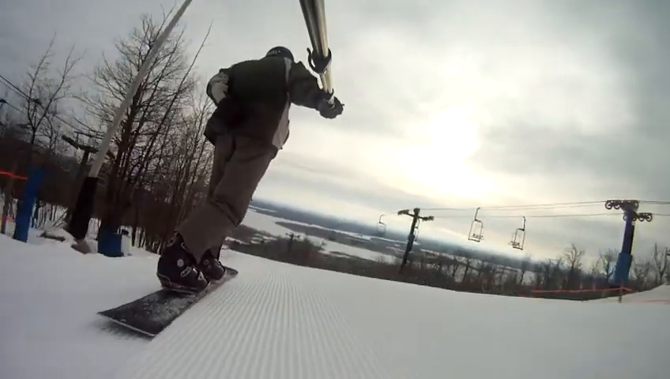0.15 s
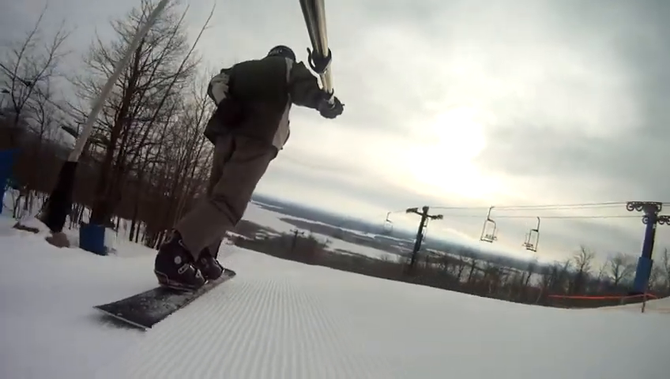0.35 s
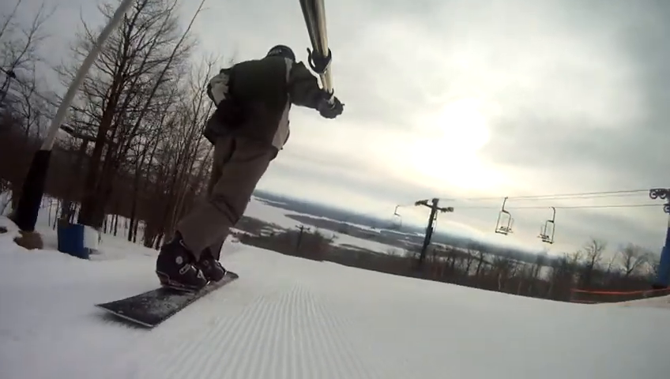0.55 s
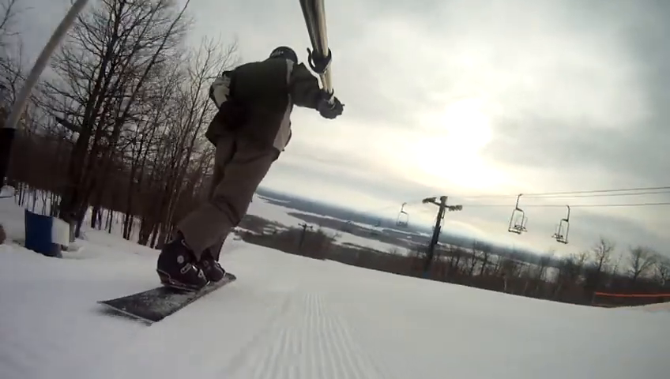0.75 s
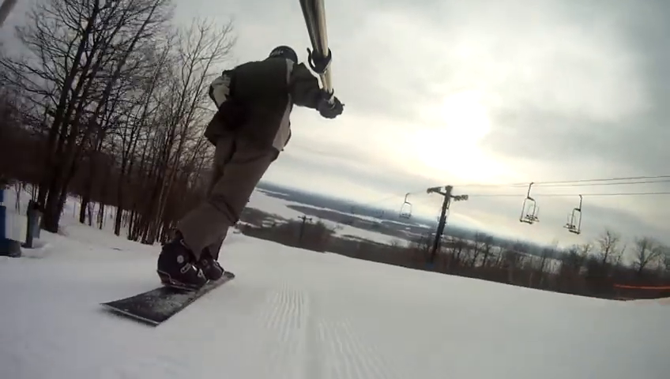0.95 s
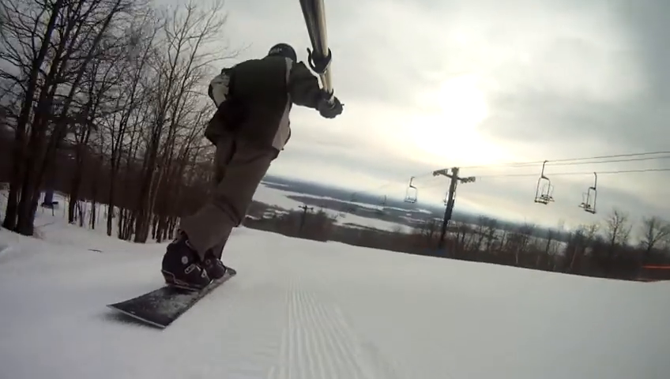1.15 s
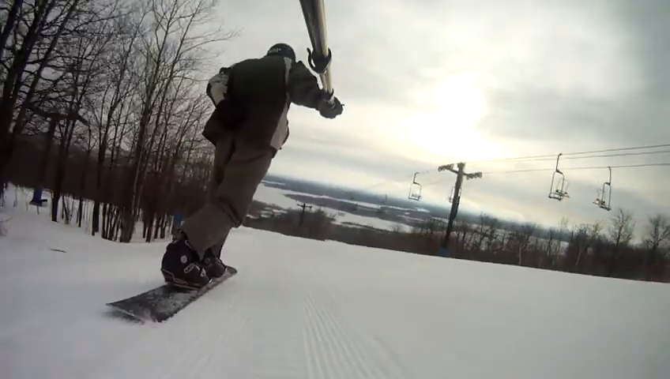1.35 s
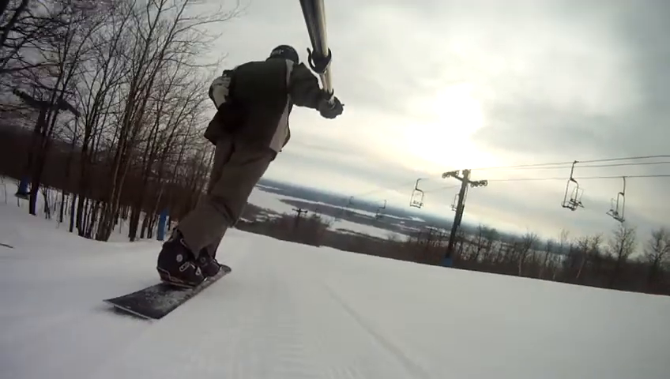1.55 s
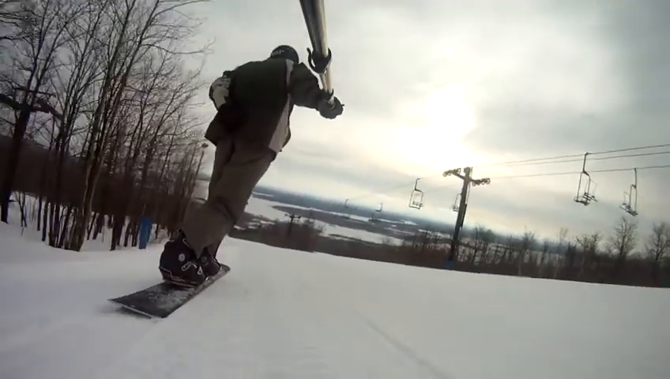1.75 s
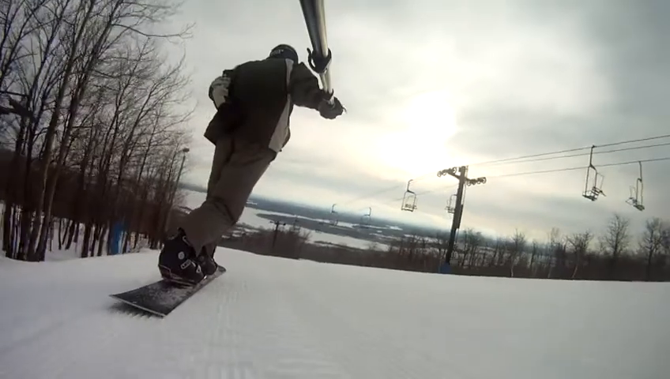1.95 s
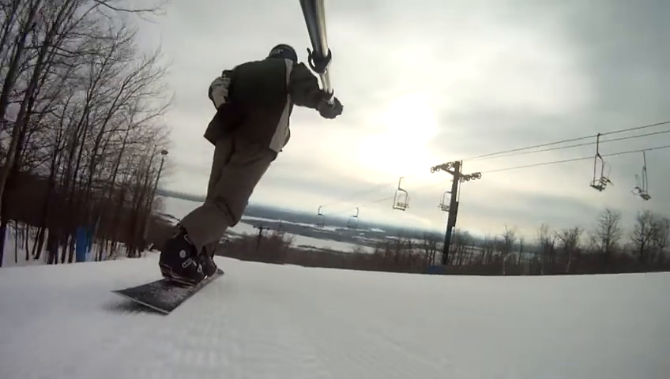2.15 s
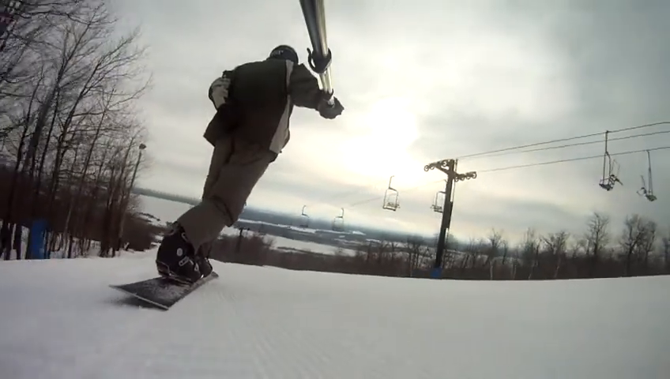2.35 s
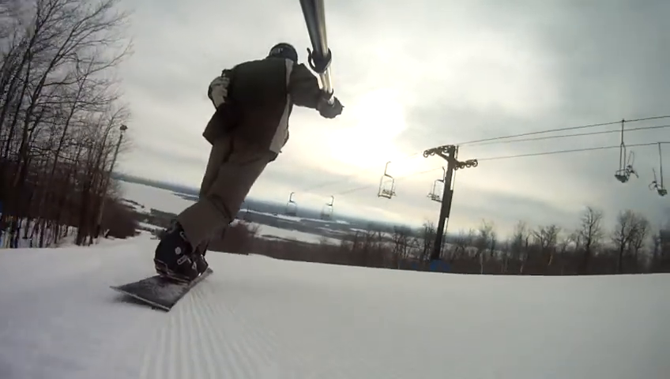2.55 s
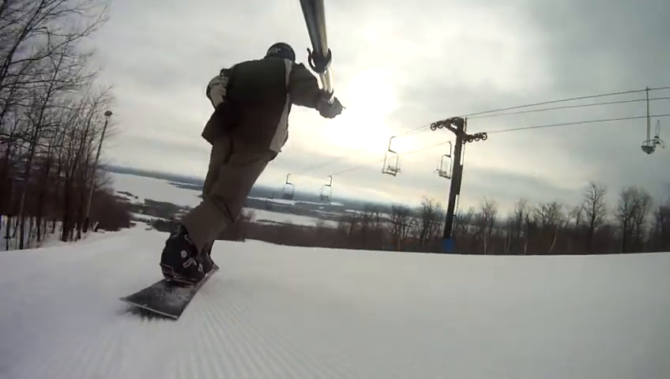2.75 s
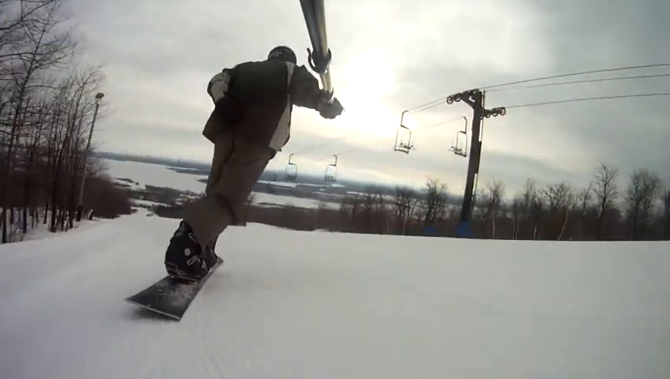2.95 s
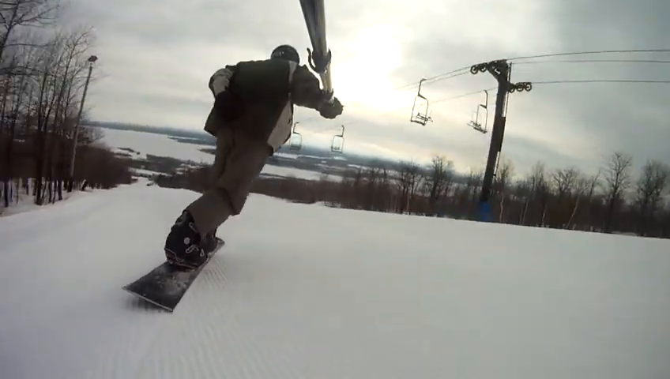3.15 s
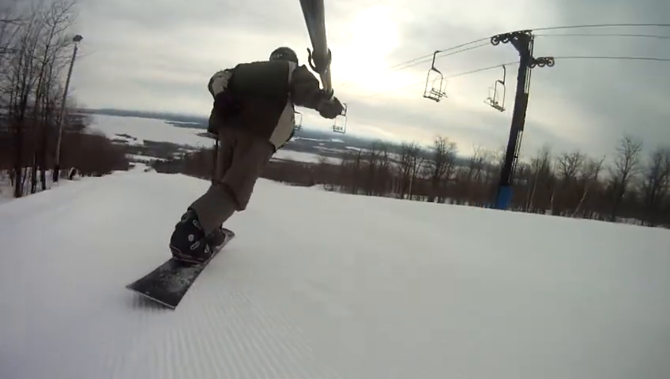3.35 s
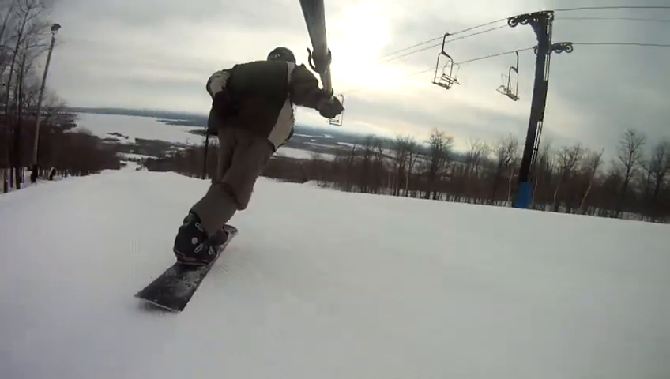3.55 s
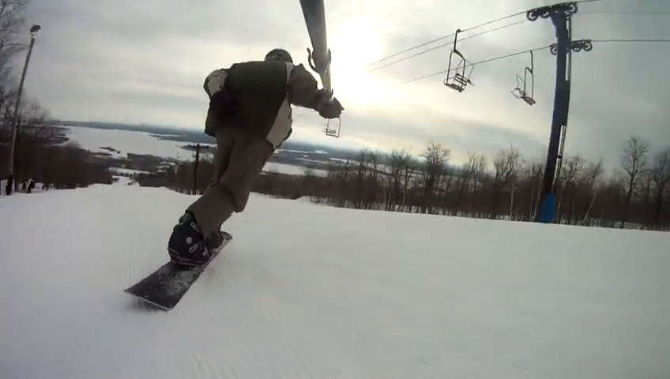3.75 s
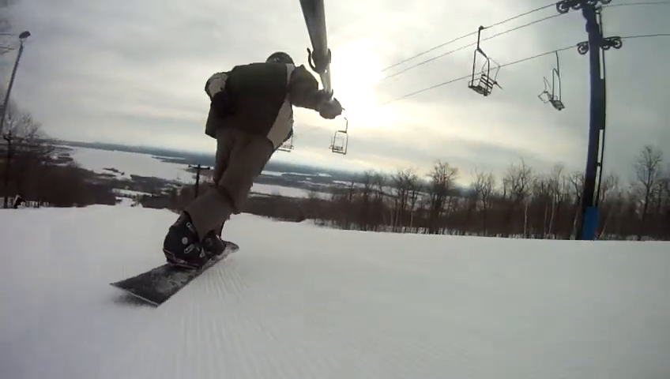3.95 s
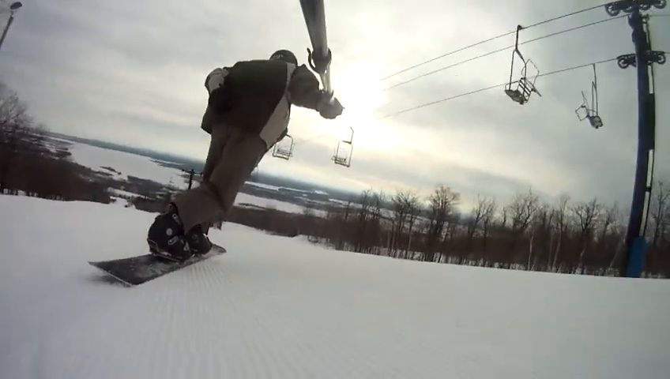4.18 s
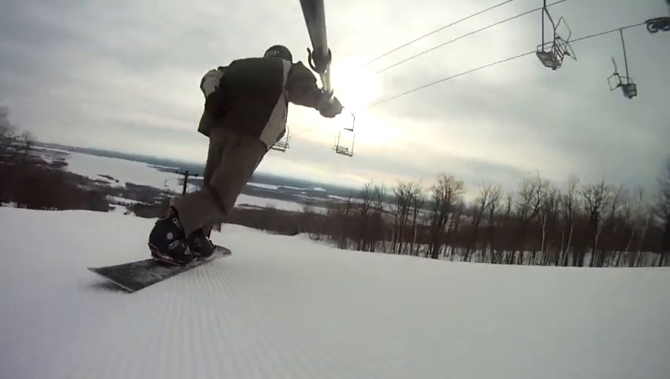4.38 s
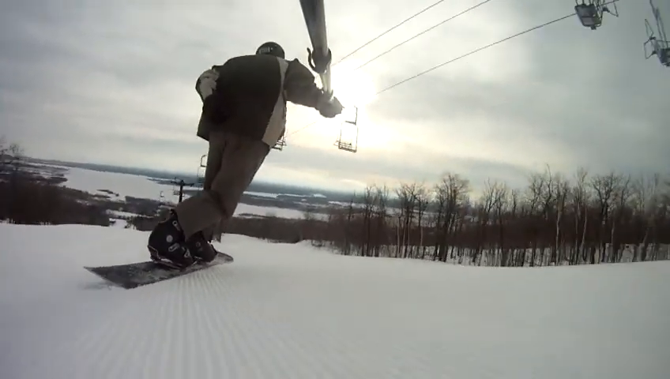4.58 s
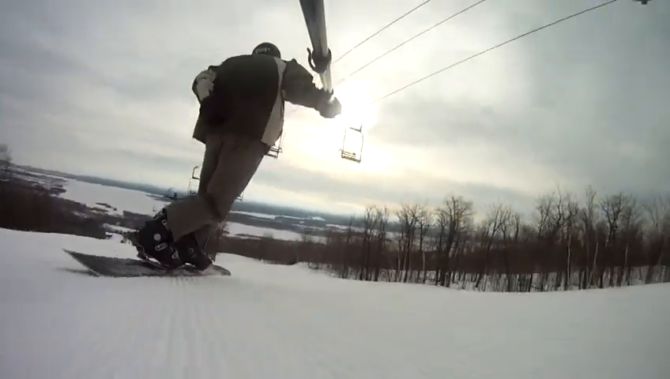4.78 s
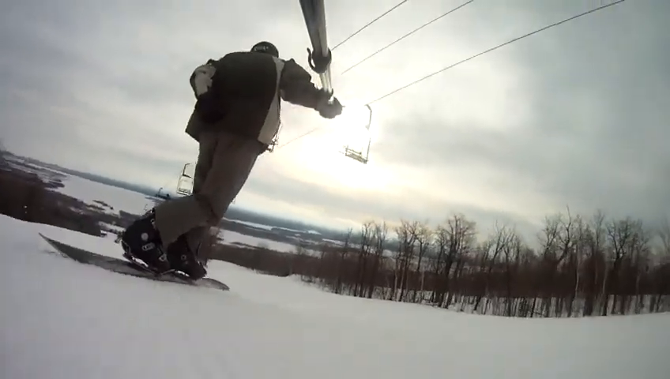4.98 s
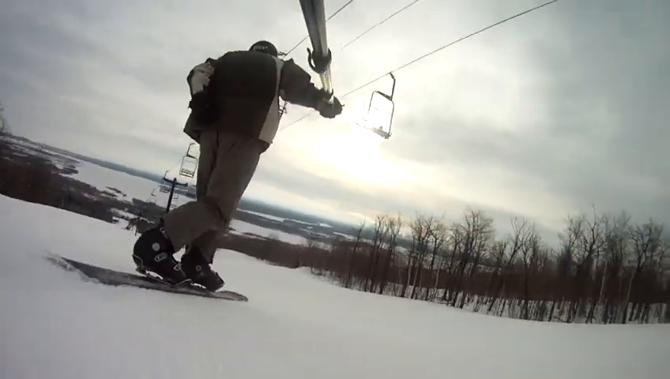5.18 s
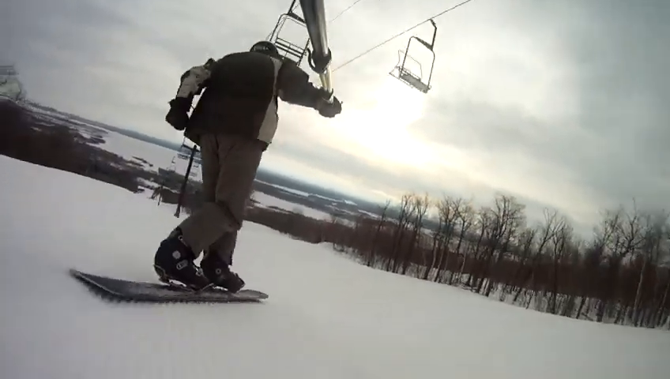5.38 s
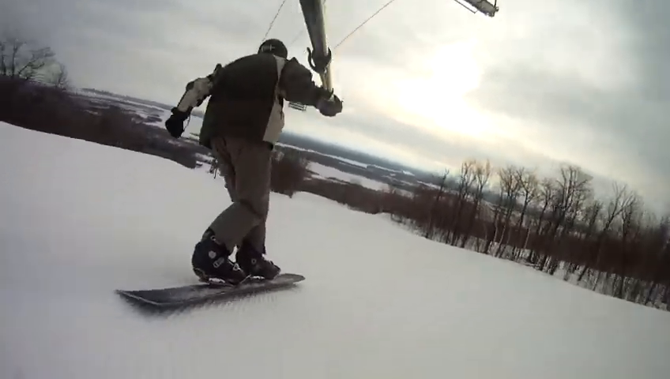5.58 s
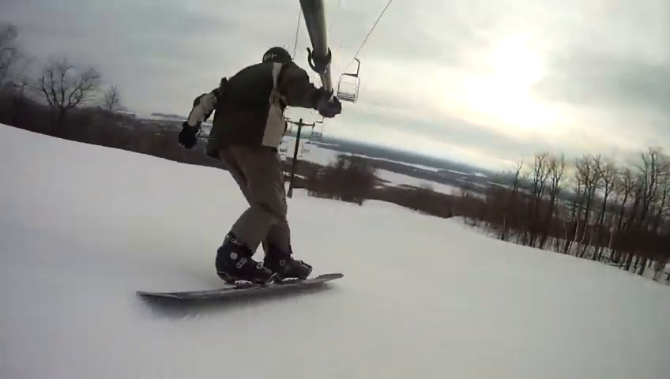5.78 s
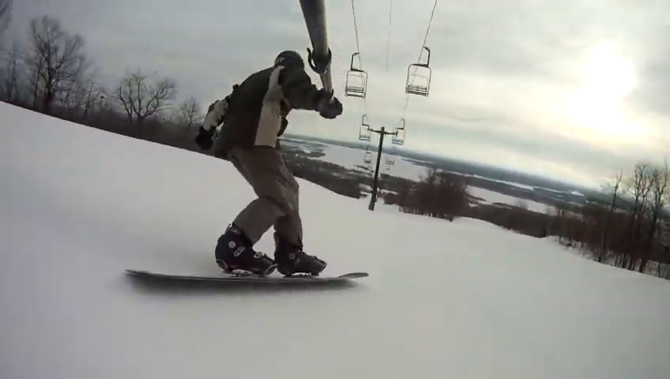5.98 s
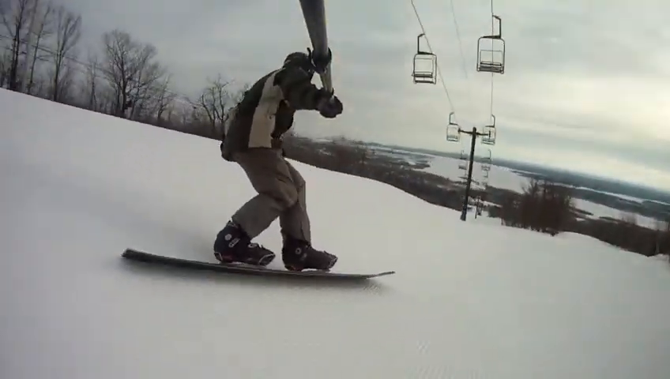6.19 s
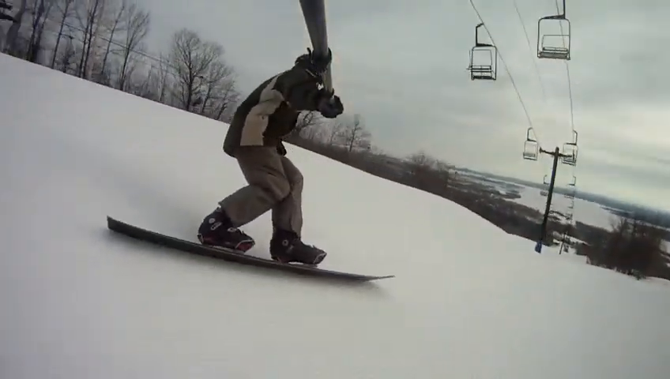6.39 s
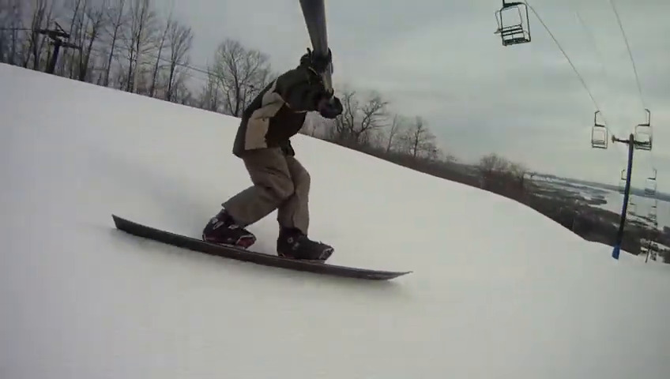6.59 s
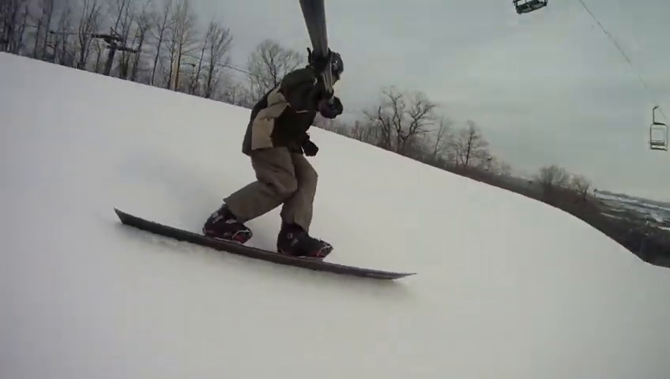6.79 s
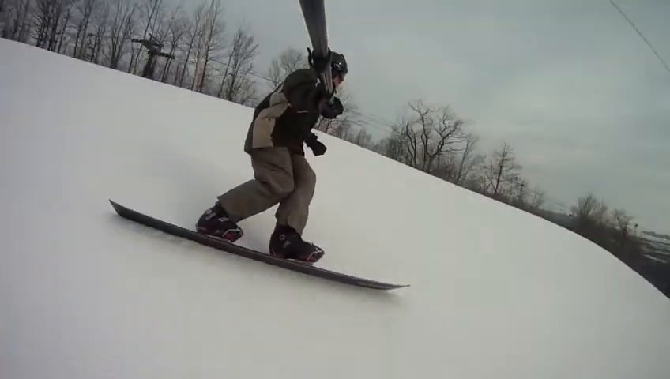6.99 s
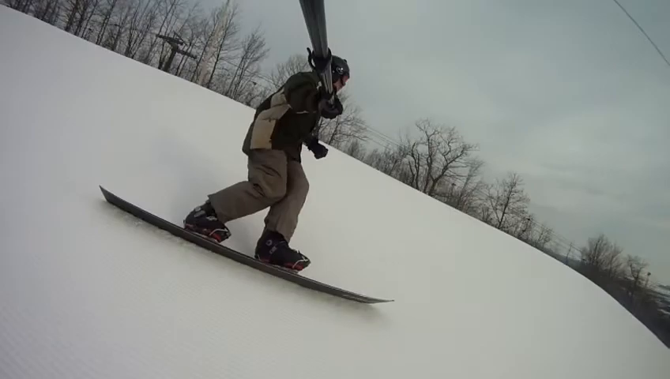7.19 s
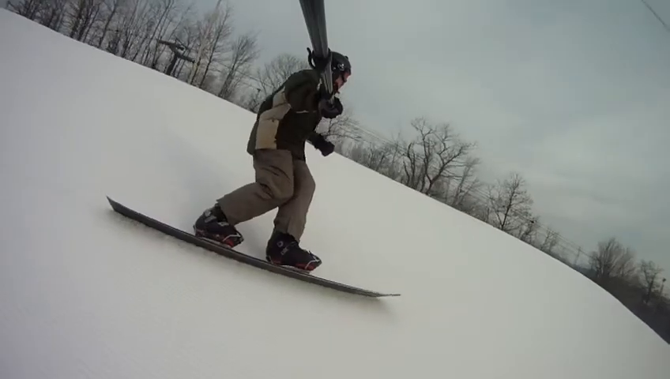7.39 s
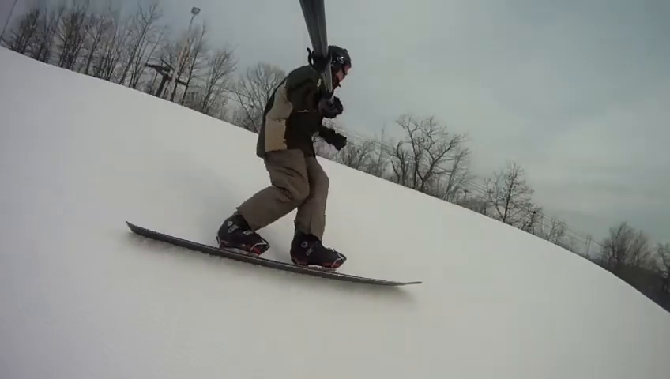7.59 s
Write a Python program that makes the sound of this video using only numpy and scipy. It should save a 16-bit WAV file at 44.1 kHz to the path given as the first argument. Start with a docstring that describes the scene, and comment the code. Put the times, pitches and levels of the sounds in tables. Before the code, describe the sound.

A snowboard runs down a groomed slope, heard close from a microphone that travels with the rider. For the first two seconds it is fairly quiet: a dry rasp of snow under the board, a soft low rumble and light gusts of wind. At about 2.7 seconds the sound swells with speed and the rasp fades. Wind now buffets the microphone with a deep, uneven rumble, while the board drums over the ridges and the snow hisses in small surges. Short, dull wind thumps hit around 3, 4.1, 4.9 and 5.7 seconds. At about 6.5 seconds the hiss dips briefly and a skidding turn begins: the edge scrapes and bites in quick, rough bursts, strongest between 6.7 and 7 seconds and continuing to the end. A last strong wind thump comes near 7.6 seconds. A faint airy whistle and a thin bright fizz ride on top.

```python
"""A snowboard runs down a groomed slope, gathers speed and ends in a skidding turn.
Ridges force the board into a low rumble, the base hisses as it fractures snow crystals,
and the steel edge scrapes and bites several times in the turn. Turbulent wind buffets the
microphone, which is in a camera case on a pole that the rider holds. The camera limits
the peaks, and its coarse sampling adds a bright fizz."""
import sys
import numpy as np
from scipy import signal
from scipy.fft import rfft, irfft, next_fast_len
from scipy.io import wavfile
from scipy.ndimage import uniform_filter1d

SR = 44100
rng = np.random.default_rng(int(sys.argv[2]) if len(sys.argv) > 2 else 0)


def store_pcm(level_fs):
    """Save levels as 16-bit WAV."""
    pcm = np.round(np.clip(level_fs, -1, 1) * 32767).astype(np.int16)
    wavfile.write(sys.argv[1], SR, np.atleast_2d(pcm).T)


N = 336483
TIME = np.arange(N) / SR


def from_db(db):
    """The decibel scale: 20 dB is a factor of ten in amplitude."""
    return 10 ** (np.asarray(db) / 20)


def unit_rms(x):
    """Normalisation to rms 1."""
    return x / np.sqrt(np.mean(x ** 2) + 1e-20)


def curves(rows):
    """Linear interpolation of each level column over time."""
    times, *columns = np.transpose(rows)
    return [np.interp(TIME, times, column) for column in columns]


def swells(rows, width_s):
    """Superposition of Gaussian humps, one for each (time, height) row."""
    return sum(height * np.exp(-((TIME - s) / width_s) ** 2) for s, height in rows)


def drift(rate_hz):
    """Low-pass noise: a random fluctuation of rms 1, mostly slower than rate_hz."""
    step, run_in = 10, 4000
    pole = np.exp(-2 * np.pi * rate_hz * step / SR)
    noise = rng.standard_normal(N // step + run_in + 2)
    slow = signal.lfilter([1], [1, -2 * pole, pole * pole], noise)[run_in:]
    return np.interp(np.arange(N) / step, np.arange(len(slow)), unit_rms(slow))


def coloured(x, spectrum):
    """Source and filter: a smooth spectral envelope shapes an excitation; rms 1."""
    size = next_fast_len(N)
    hz = np.maximum(np.arange(size // 2 + 1) * SR / size, 1)
    points_hz, points_db = np.transpose(spectrum)
    envelope = from_db(np.interp(np.log(hz), np.log(points_hz), points_db))
    bass_rolloff = np.minimum(hz / points_hz[0], 1) ** 2
    return unit_rms(irfft(rfft(x, size) * envelope * bass_rolloff, size)[:N])


def resonance(x, hz, width_hz, gain_db):
    """One resonance (antiresonance if the gain is negative) on a flat response."""
    cosine = np.cos(2 * np.pi * hz / SR)
    k, a = np.tan(np.pi * width_hz / SR), from_db(gain_db / 2)
    return signal.lfilter([1 + k * a, -2 * cosine, 1 - k * a], [1 + k / a, -2 * cosine, 1 - k / a], x)


def steadied(x, span_s):
    """Division by the running rms evens out swells longer than span_s."""
    span = int(span_s * SR)
    power = uniform_filter1d(uniform_filter1d(x ** 2, span), span)
    return x / np.sqrt(power + 1e-9)


# Whistles of the gaps in the case: (frequency [Hz], bandwidth [Hz], relative level [dB])
GAP_TONES = [(2813, 340, -0.5), (3778, 93, -7.5)]

def whistles(flow_db, judder):
    """Flow-excited resonance: air sings faintly in the gaps of the case, louder with speed."""
    tones = np.zeros(N)
    for hz, width_hz, db in GAP_TONES:
        band = signal.butter(2, [hz - width_hz / 2, hz + width_hz / 2], "band", fs=SR, output="sos")
        tones += from_db(db) * unit_rms(signal.sosfilt(band, rng.standard_normal(N)))
    return from_db(flow_db - 12.5 + 1.7 * judder) * tones


# Spectrum of the eddies: (frequency [Hz], relative level [dB])
EDDY_SPECTRUM = [(12, -11), (25, -1.5), (50, 2), (100, 0.5), (160, -3.5), (250, -10.5), (500, -24),
                 (1000, -61)]
# Headwind, rising with speed: (time [s], relative level [dB])
HEADWIND_LEVELS = [(0, -38), (0.3, -30.5), (1.4, -29), (1.75, -25.5), (2.45, -25), (2.72, -15.5),
                   (3.6, -18), (5.4, -18.0), (6.3, -16.5), (6.9, -24), (7.63, -15.5)]
# Single gusts and lulls: (time [s], level change [dB])
GUSTS_AND_LULLS = [(0.67, -2), (0.82, 1), (1.02, -5), (1.09, 7), (1.37, 6), (1.81, 5), (2.13, 7.5),
                   (2.18, -4), (2.61, 2), (2.79, 6), (5.75, 3.5), (6.28, 0.5)]
# Large eddies striking the case: (time [s], relative peak level [dB], half-width [s])
EDDY_SLAPS = [(0.82, -10, 0.0043), (2.604, -4.5, 0.0035), (2.953, 3.5, 0.0041), (4.066, 0, 0.0031),
              (4.118, 2, 0.0027), (4.376, -3, 0.0033), (4.902, 4.5, 0.0018), (5.02, 0.5, 0.0049),
              (5.742, 1, 0.0033), (5.871, -2.5, 0.0034), (6.485, 0, 0.0026), (7.591, 6.5, 0.0048)]

def wind(buffet_db):
    """Vortex shedding: eddies from the case press on the microphone, the largest as single pulses."""
    headwind_db, = curves(HEADWIND_LEVELS)
    level_db = headwind_db + swells(GUSTS_AND_LULLS, width_s=0.026) + buffet_db + 0.5
    eddies = steadied(coloured(rng.standard_normal(N), EDDY_SPECTRUM), span_s=0.12)
    slaps = np.zeros(N)
    for s, db, half_width_s in EDDY_SLAPS:
        u = (TIME - s) / half_width_s
        slaps += from_db(db - 5.0) * (1 - u ** 2) * np.exp(-u ** 2 / 2)   # a push between two suctions
    return from_db(level_db) * eddies + slaps


def crystals(per_s, spread_db, rub):
    """Brittle fracture: grains break at random, a few loudly, over the smooth rub of the finest."""
    sizes = from_db(spread_db * np.minimum(rng.exponential(1, N), 5))
    signs = rng.choice([-1, 1], N)
    breaks = rng.random(N) < per_s / SR
    return unit_rms(sizes * signs * breaks) + rub * rng.standard_normal(N)


# Spectrum of snow under a slow board: (frequency [Hz], relative level [dB])
RASP_SPECTRUM = [(1000, -23), (1600, -3), (1950, 0.5), (2500, -3), (3300, -21), (4200, -11), (5100, -4),
                 (7000, -27)]

def slow_rasp(judder):
    """Sliding friction: the base drags over the ridges with a dry rasp that dies as speed builds."""
    speed_up_s, fade_s = 2.2, 0.35
    fade = np.exp(-np.maximum(TIME - speed_up_s, 0) / fade_s)
    grains = crystals(per_s=5900, spread_db=3.0, rub=0.95)
    return fade * from_db(-53.5 + 0.5 * judder) * coloured(grains, RASP_SPECTRUM)


# Spectrum of fine crystals being crushed: (frequency [Hz], relative level [dB])
HISS_SPECTRUM = [(900, -19), (1600, -4), (2300, -1), (3000, 7), (4000, -2), (5200, -2), (6000, 2.5),
                 (7000, -40)]

def base_hiss(hiss_db, judder):
    """Shot noise: the harder the base presses, the more crystals it crushes each second."""
    edge_change_s, settle_s = 6.49, 0.29   # tipping onto the edge lifts the base; it then sinks back
    lifted = (TIME > edge_change_s) * np.exp(-np.abs(TIME - edge_change_s) / settle_s)
    level_db = hiss_db + 10.0 + 0.75 * judder - 16.5 * lifted
    per_s = 7000 * from_db((hiss_db - hiss_db.max()) / 2)
    grains = crystals(per_s, spread_db=2.5, rub=0.87)
    return from_db(level_db) * coloured(grains, HISS_SPECTRUM)


# Spectrum of coarse grains shearing: (frequency [Hz], relative level [dB])
SCRAPE_SPECTRUM = [(350, -4.5), (700, 3), (900, 0), (1300, -1.5), (1800, -7), (2400, -8.5), (3500, -14.5),
                   (4600, -25), (6000, -22), (7000, -60)]
# Ring of the steel edge: (frequency [Hz], bandwidth [Hz], gain [dB])
EDGE_MODE = (3780, 300, 4.5)

def edge_scrape(scrape_db, bites, judder):
    """Shear failure: the edge cuts off coarse grains, in bursts where it bites, and rings faintly."""
    force = np.hypot(from_db(scrape_db), bites)
    grains = coloured(crystals(per_s=5000, spread_db=2.0, rub=1.0), SCRAPE_SPECTRUM)
    return force * from_db(1.24 + 0.5 * judder) * resonance(grains, *EDGE_MODE)


# Spectrum of the vibrating board: (frequency [Hz], relative level [dB])
RUMBLE_SPECTRUM = [(60, -38), (130, -1), (200, 0.5), (300, 0), (400, 0), (500, -2), (580, -6.5),
                   (700, -17.5), (900, -25.5), (2000, -47)]

def board_rumble(rumble_db, thrum):
    """Forced vibration: the board drums over the groomed ridges, harder when the edge bites."""
    force = np.hypot(from_db(rumble_db + 1.53), thrum)
    return force * steadied(coloured(rng.standard_normal(N), RUMBLE_SPECTRUM), span_s=0.06)


# Relative levels of the ride, slow, fast, then turning: (time [s], rumble [dB], scrape [dB], hiss [dB])
RIDE_LEVELS = [(0, -37.5, -52.5, -60.5), (1.15, -34.5, -54, -63.5), (1.45, -32, -48.5, -59),
               (2.0, -32, -49, -58), (2.45, -34, -48.5, -60.5), (2.72, -23.5, -40, -51),
               (3.15, -21.5, -40, -48.5), (3.85, -19.5, -36.5, -45.5), (4.2, -22, -37.5, -48.5),
               (5.05, -24, -39, -49.5), (5.68, -21.5, -37, -46), (5.9, -28.5, -39.5, -48.5),
               (6.4, -22.5, -38, -49.5), (6.6, -20.5, -36, -48), (7.02, -19, -28, -51.5),
               (7.25, -21, -35.5, -52), (7.63, -18.5, -32.5, -47)]
# Ridges pressing on the board: (time [s], level rise [dB])
RIDGE_LOADS = [(0.04, 0.5), (0.76, 5.5), (1.49, 3), (2.7, 2), (2.92, 2.5), (3.12, 4), (3.25, 3.5),
               (3.62, 2.5), (4.06, 2.5), (4.36, 4.5), (4.875, 5), (5.38, 3.5), (5.72, 2), (6.18, 4)]
# Relative levels of the edge's bites into firm snow: (time [s], scrape [dB], board thrum [dB])
EDGE_BITES = [(6.539, -33, -24), (6.696, -27.5, -11.5), (6.735, -26.5, -19), (6.87, -27.5, -23.5),
              (7.025, -26.5, -31), (7.199, -30.5, -16.5), (7.378, -28, -26), (7.502, -29, -14.5),
              (7.572, -31.5, -20)]

def scene():
    """Superposition: air and snow sounds, linked by shared modulation, add at one microphone."""
    rumble_db, scrape_db, hiss_db = curves(RIDE_LEVELS) + swells(RIDGE_LOADS, width_s=0.024)
    bites = swells([(s, from_db(db)) for s, db, _ in EDGE_BITES], width_s=0.023)
    thrum = swells([(s, from_db(db)) for s, _, db in EDGE_BITES], width_s=0.023)
    judder = unit_rms(drift(rate_hz=24) + 2.0 * drift(rate_hz=91))   # the board's rapid shaking
    buffet_db = 1.78 * drift(rate_hz=8.8)   # wind and rumble surge together
    flow_db = (rumble_db + hiss_db) / 2   # both grow with speed, as does the airflow
    air = wind(buffet_db) + whistles(flow_db, judder)
    carving = board_rumble(rumble_db + 0.75 * buffet_db, thrum) + edge_scrape(scrape_db, bites, judder)
    gliding = base_hiss(hiss_db, judder) + slow_rasp(judder)
    return np.tile(air + carving + gliding, (2, 1))


def limiter(x, threshold_db, release_db_per_s=73.0, attack_s=0.0026):
    """Automatic gain control: peaks over the threshold pull the gain down fast; it recovers slowly."""
    over_db = np.maximum(20 * np.log10(np.abs(x) + 1e-9) - threshold_db, 0)
    release_db = release_db_per_s * TIME
    held_db = np.maximum.accumulate(over_db + release_db) - release_db
    pole = np.exp(-1 / (attack_s * SR))
    return x * from_db(-signal.lfilter([1 - pole], [1, -pole], held_db))


def sample_and_hold(x, passband_hz=5140, rate_hz=12000):
    """Spectral imaging: holding each slow sample mirrors the sound into the treble as a fizz."""
    band_limited = signal.sosfilt(signal.butter(12, passband_hz, fs=SR, output="sos"), x)
    samples = signal.resample_poly(band_limited, rate_hz, SR, axis=-1)
    steps = np.repeat(samples, 4, axis=-1)
    return signal.resample_poly(steps, SR, 4 * rate_hz, axis=-1)[:, :N]


# Resonance and antiresonance of the camera in its case: (frequency [Hz], bandwidth [Hz], gain [dB])
CASE_MODES = [(2700, 140, 1), (3370, 350, -3.5)]

def record(dry):
    """Systems in cascade: case resonance, limiting, soft saturation, coarse sampling and a treble cut."""
    for hz, width_hz, gain_db in CASE_MODES:
        dry = resonance(dry, hz, width_hz, gain_db)
    thresholds_db = (-7.747, -7.853)   # left, right
    limited = np.array([limiter(x, db) for x, db in zip(dry, thresholds_db)])
    saturated = 1.506 * np.tanh(limited / 1.33)
    treble_cut = signal.ellip(12, 0.2, 80, 15300, fs=SR, output="sos")
    return signal.sosfilt(treble_cut, sample_and_hold(saturated))


dry = scene()
out = record(dry)
store_pcm(out)
```